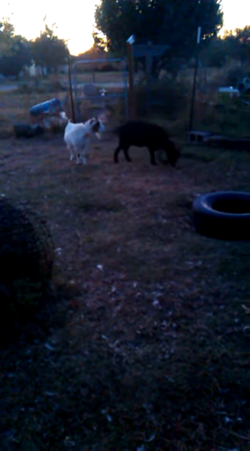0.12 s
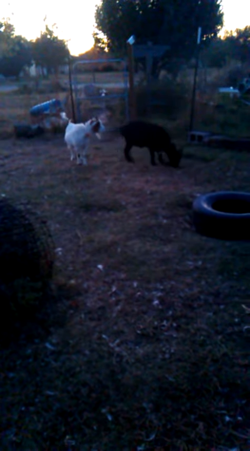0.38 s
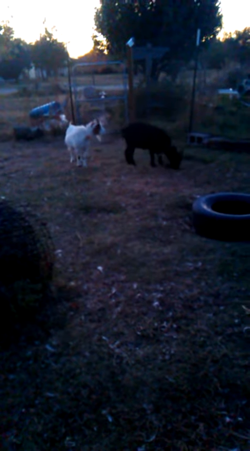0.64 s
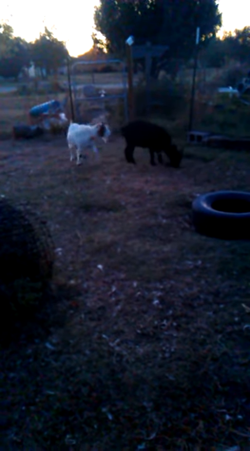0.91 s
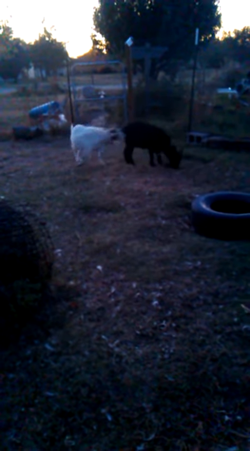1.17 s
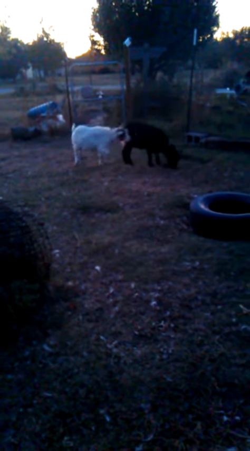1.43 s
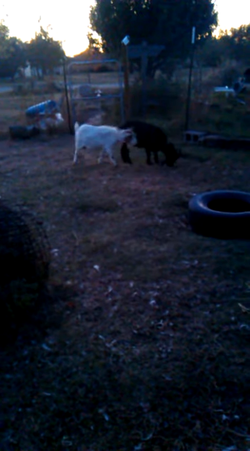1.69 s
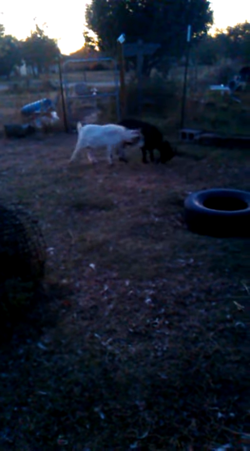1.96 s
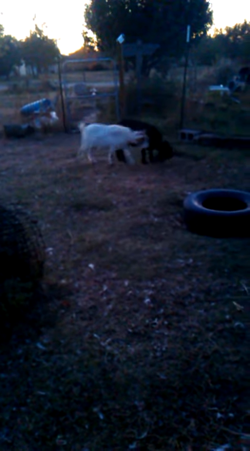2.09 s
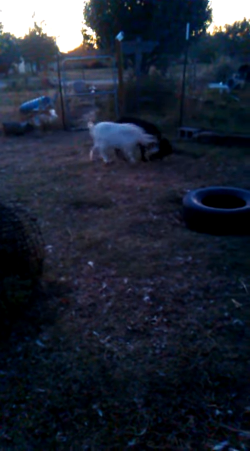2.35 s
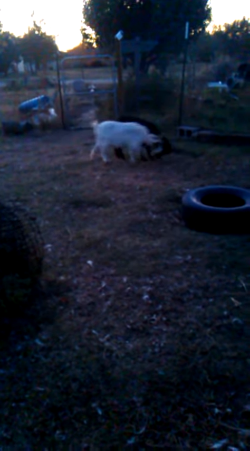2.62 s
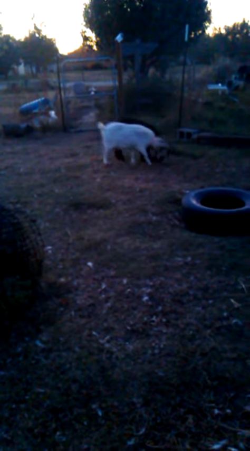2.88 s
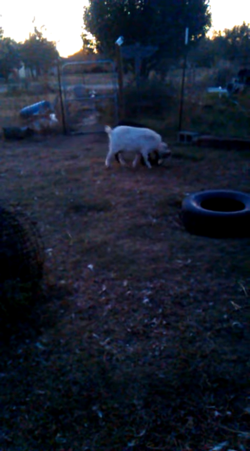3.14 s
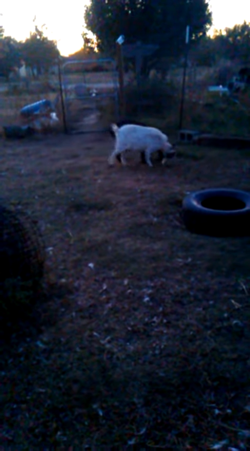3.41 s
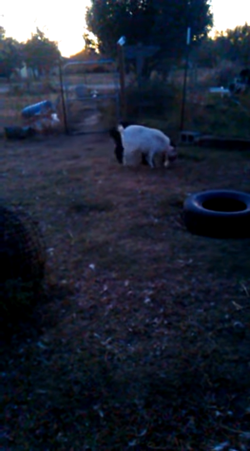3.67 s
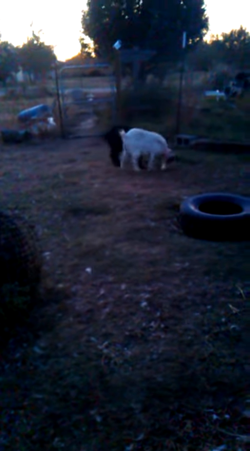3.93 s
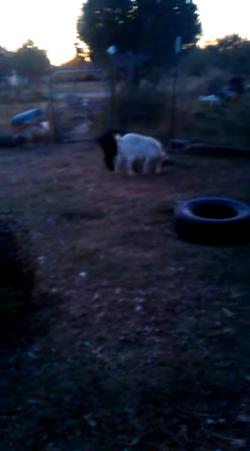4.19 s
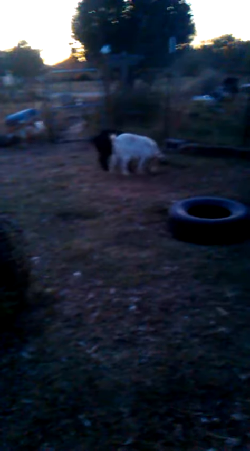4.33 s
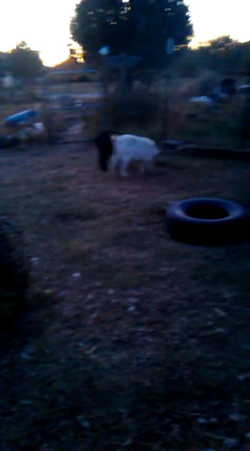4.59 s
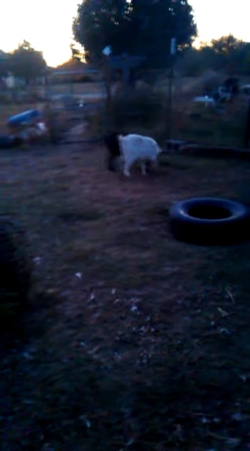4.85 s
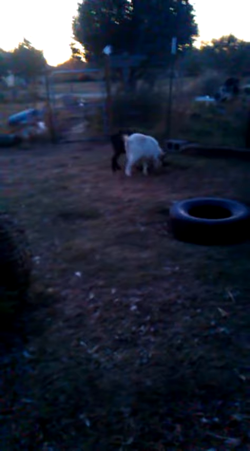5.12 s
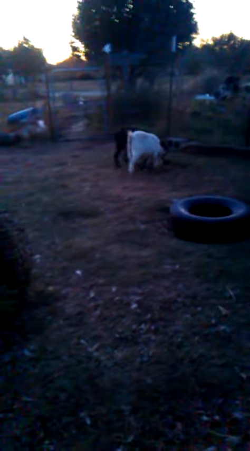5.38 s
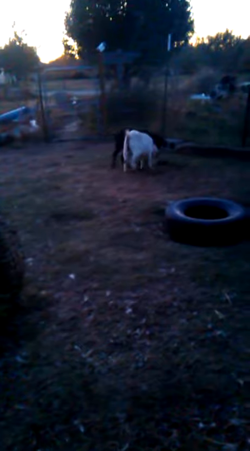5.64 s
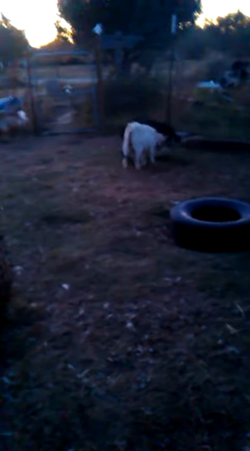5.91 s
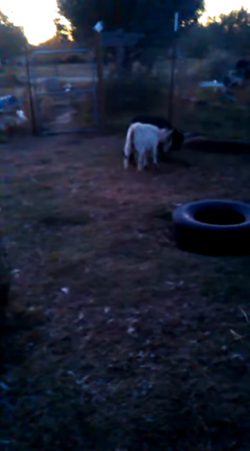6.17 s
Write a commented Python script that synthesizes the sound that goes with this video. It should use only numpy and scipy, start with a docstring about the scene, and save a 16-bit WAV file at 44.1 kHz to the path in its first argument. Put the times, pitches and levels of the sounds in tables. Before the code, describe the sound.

A quiet open yard, heard at a distance: faint low air noise sways under fine hiss, and a far engine hums low, around 140 and 280 Hz, wavering. High insect buzz swells briefly near 0.1, 1.5, 2.3 and 5.8 s. Soft, grainy scuffs on dry earth come irregularly from 0.2 to 2.8 s, with tiny rising bird chirps at the start, 1.1 and 2.7 s. A light click at 2.9 s precedes the goat, by far the loudest sound. It gives a short bleat at 3.0 s, a higher one at 3.3, a harsh, torn scream from 3.45 to 3.8, then a raspy cry at 3.97 that clears at 4.25 into a pure, slightly sagging whine, closing and dropping by 4.6. Short echoes trail away. Small clicks follow at 4.7 and 5.0-5.1, a chirp at 5.2, scattered scuffs, and a last click near 6.2 as the hum strengthens.

```python
"""A goat screams in an open yard: two short bleats, a harsh one, and a last that clears into a pure whine. Its
voice is a pulse train of the vocal folds, roughened by strain, through throat resonances; buildings echo it. A
far engine hums in wavering sine orders; insects are band noise that swells; a bird chirps in two gliding tones.
Scuffs on dry ground are grainy noise strokes; light clicks, and a ring echoing the whine's end, are short
resonant bursts; low air noise sways under hiss."""
import sys
import numpy as np
from scipy import signal
from scipy.fft import rfft, irfft, next_fast_len
from scipy.io import wavfile
from scipy.ndimage import uniform_filter1d

SR = 44100
rng = np.random.default_rng(int(sys.argv[2]) if len(sys.argv) > 2 else 0)


def generate_wav(sig):
    """Save sig (samples, or channels by samples) to the path in sys.argv[1] as 16-bit PCM at SR."""
    pcm = np.round(np.clip(np.atleast_2d(sig).T, -1, 1) * 32767).astype(np.int16)
    wavfile.write(sys.argv[1], SR, pcm)


N = 277389
TIME_S = np.arange(N) / SR

# Air noise spectrum. Each row: frequency in Hz, relative density in dB per Hz.
AIR_SPECTRUM = [(8, -22), (18, 0), (27, -1.5), (38, -21), (52, -11), (90, -23), (230, -14.5), (400, -16.5),
                (670, -20), (1100, -24), (1900, -30), (2800, -33.5), (5200, -33.5), (7700, -36.5),
                (15500, -39)]
AIR_RMS_DB = -58.5  # before the slow sway

# Hum of the far engine. Each row: time in seconds, first order level in dB, second order level in dB.
ENGINE_LEVELS = [(0.0, -73, -60), (0.42, -73, -66), (0.7, -69, -55.5), (2.52, -82.5, -66.5),
                 (2.79, -64.5, -58), (3.78, -66.5, -62.5), (4.2, -74, -79.5), (4.57, -64, -61.5),
                 (6.17, -60.5, -59), (6.29, -57, -56.5)]
ENGINE_START_HZ, ENGINE_SAG_HZ_PER_S = 142.4, 0.7  # firing rate, slowly falling

# Swells of the insect chorus. Each row: centre in seconds, time from peak to 1/e in seconds, peak level in dB.
INSECT_SWELLS = [(.07, 0.23, -64.5), (1.462, 0.12, -59), (2.294, 0.22, -71.5), (5.786, 0.13, -59.5),
                 (6.3, .13, -68)]
INSECT_BED_DB = -73

# Bird chirps. Each row: start in seconds, level before the envelope in dB.
BIRD_CHIRPS = [(-.03, -51.5), (1.109, -46), (2.723, -47), (5.216, -46)]

# Soft scuffs. Each row: centre in seconds, half length (to -17 dB) in seconds, body level in dB,
# gritty top level in dB.
SCUFF_STROKES = [(.193, 0.041, -54.5, -67), (0.573, .07, -55, -63.5), (0.994, 0.039, -51.5, -63.5),
                 (1.192, 0.039, -51.5, -70), (1.28, .08, -62, -76), (1.449, 0.076, -57.5, -61.5),
                 (1.595, 0.037, -50, -65), (1.855, 0.037, -50.5, -61.5), (2.139, .08, -63, -69),
                 (2.383, 0.034, -54.5, -55.5), (2.799, .075, -58, -69), (4.777, 0.027, -60, -65),
                 (4.993, 0.062, -55.5, -58.5), (5.305, .11, -60.5, -76), (5.614, 0.046, -57.5, -69),
                 (6.02, 0.091, -56, -65.5), (6.228, 0.057, -52.5, -55.5)]
# Spectrum of the gritty top. Each row: frequency in Hz, relative level in dB.
GRIT_SPECTRUM = [(1500, -19), (3000, -0.5), (4300, 6), (5400, 6.5), (6500, -7), (9000, -27), (16000, -9)]
# Ringing of a scuff's body. Each row: multiple of the body resonance, half width (to -12 dB) in Hz,
# relative level in dB.
SCUFF_BODY_MODES = [(.66, 232, -2), (0.838, 190, -4), (1.003, 161, 4.5), (1.26, 170, -4.5),
                    (1.66, 350, -17)]
QUICK_HALF_S, SLOW_HALF_S = 0.06, 0.1  # half lengths of a smooth scuff and of a fully juddering one
QUICK_BODY_HZ, SLOW_BODY_HZ, SLOW_JUDDER_DEPTH = 1950, 1430, 0.9

# Light clicks, and one ring at 4.683 s that echoes the end of the whine. Each row: start in seconds, # peak
# level in dB, ring in Hz, T60 in seconds.
SHORT_RINGS = [(2.932, -44, 6400, .0065), (4.683, -41, 5100, .042), (4.969, -42, 4870, 0.013),
               (5.062, -48.5, 634, .06), (5.1174, -34.5, 5300, 0.011), (5.129, -47, 272, 0.14),
               (6.173, -42.5, 6060, 0.043)]

# Reflections from ground, fence and buildings. Each row: delay in seconds, relative level in dB.
YARD_ECHOES = [(.021, -23), (.052, -20), (.09, -18)]
# Decay of the yard's tail. Each row: frequency in Hz, T60 in seconds.
YARD_DECAY = [(300, 0.28), (1200, 0.86), (3000, 0.73), (5500, 0.43), (12000, 0.13)]

# Throat resonances for five shapes of the mouth.
# Each row: centre in Hz, half width (to -12 dB) in Hz, relative level in dB.
HALF_OPEN_MODES = [(583, 170, 18.5), (990, 155, -6), (1378, 146, 8), (2017, 290, -10.5), (2950, 215, -14),
                   (4250, 160, 1.5), (4674, 250, 5.5), (5380, 205, -2.5), (6310, 420, -6), (8400, 490, -31),
                   (9820, 180, -18), (11050, 660, -40), (12700, 580, -39)]
HALF_OPEN_CLEAR_MODES = [(553, 160, 7), (1067, 93, -14), (1510, 400, -12), (2120, 200, -10.5),
                         (2930, 186, -13), (4275, 177, -10), (4747, 207, 5), (5510, 110, -1),
                         (6180, 400, -4.5), (8700, 660, -29.5), (9850, 230, -29), (10900, 410, -33),
                         (12900, 450, -33)]
WIDE_OPEN_MODES = [(633, 303, 18), (1032, 53, 2), (1367, 192, 4.5), (1756, 367, -4), (2830, 170, -15),
                   (3255, 250, -20.5), (4120, 220, -16.5), (4817, 330, -5), (5587, 475, 0),
                   (6130, 460, -14.5), (6980, 160, -27), (8130, 760, -28.5), (8940, 410, -35),
                   (10560, 820, -35)]
NARROWING_MODES = [(592, 207, -9.5), (1018, 135, -1), (1328, 113, 5), (1740, 330, -10.5),
                   (2730, 240, -18.5), (4016, 250, -4), (4650, 280, 1), (5550, 310, 3.5),
                   (6300, 300, -11.5), (7100, 120, -22), (8260, 970, -26), (9870, 320, -23.5),
                   (11060, 310, -28.5)]
WHINE_MODES = [(586, 370, 2.5), (1195, 344, -1.5), (2660, 130, -26.5), (3717, 89, 3.5), (4345, 340, 3),
               (5080, 190, -6.5), (5630, 160, -10.5), (6338, 107, 1.5), (7060, 820, -19), (8540, 500, -28),
               (9670, 340, -17.5), (10100, 160, -27), (10800, 290, -24), (11900, 300, -32)]

# Bleats. Each row: start in seconds, length in seconds, rise to the top pitch in seconds, first pitch in Hz,
# top pitch in Hz, last pitch in Hz, attack time constant in seconds, release in seconds, chest level in dB,
# open mouth level in dB, shrill edge level in dB, roughness 0-1, quaver in dB.
BLEAT_EVENTS = [(2.985, 0.21, .075, 471, 556, 493.5, 0.0063, 0.031, -36, -34.5, -27.5, 0.22, 0),
                (3.285, .134, .053, 501, 750, 655, .002, .032, -32, -27.5, -28.5, .31, 2),
                (3.459, .371, .1, 655, 675, 648, 0.012, .082, -32, -27, -22.2, .77, .5),
                (3.974, .29, 0.25, 600, 643, 635, .014, 0.034, -33, -31.5, -26.5, .3, .5)]
# Spells in which the voice breaks into a rasp. Each row: start in seconds, length in seconds, roughness 0-1,
# pitch bend as a share, level change in dB.
RASP_SPELLS = [(3.047, 0.076, 0.79, .05, 5), (3.269, 0.038, 0.88, 0.00084, -6.5),
               (3.39, 0.043, 0.86, -0.014, -3.5), (3.45, 0.31, 0.77, 0, -0.5),
               (3.961, 0.28, .72, -.06, -0.5)]
RASP_BREAK_S, RASP_SHRILL_SHARE = 0.0041, 0.47  # onset time; share of the level change in the shrill edge
PITCH_ARCH_POWER, QUAVER_HZ = 1.5, 19.1
ONSET_DB, RELEASE_DB = -19, -16  # level change at a bleat's very start and end
CHEST_LAG, SHRILL_LAG = 1.7, 1.53  # attack time relative to the open mouth
SHRILL_TIRING_DB_PER_S = -13

# Whine. Triples of dB: chest, open mouth, shrill edge.
WHINE_START_S, WHINE_LENGTH_S, WHINE_ATTACK_S = 4.238, 0.362, 0.0057
WHINE_START_HZ, WHINE_SAG_HZ, WHINE_ROUGHNESS = 645.5, 30.76, 0.022
WHINE_REGISTERS_DB, WHINE_TIRING_DB_PER_S = (-35, -27.5, -32), -19  # tiring: shrill edge only
CLOSING_S, CLOSING_CHANGES_DB = 0.074, (10, -11.5, 4)  # the mouth shuts
# The folds slacken at the very end: time constant, pitch drop, added roughness, level change.
LET_GO_S, LET_GO_HZ, LET_GO_ROUGHNESS, LET_GO_DB = 0.009, 56, 0.37, -3.5

BAND_EDGE_HZ = 15750


def amp(db):
    """Decibels to gain."""
    return 10 ** (np.asarray(db) / 20)


def unit(x):
    """Scales to rms 1."""
    return x / np.sqrt(np.mean(x ** 2) + 1e-20)


def read(points, hz):
    """Interpolates a spectrum table on a log-frequency axis."""
    table_hz, value = np.transpose(points)
    return np.interp(np.log(hz + 1), np.log(table_hz + 1), value)


def add(mix, start_s, sound):
    """Mixes a sound in, cropped to the mix."""
    start = round(start_s * SR)
    sound = sound[max(-start, 0):]
    part = mix[max(start, 0):][:len(sound)]
    part += sound[:len(part)]


def shape(x, gain, padding=4096):
    """Filters x by a gain that is a function of frequency."""
    n = next_fast_len(len(x) + padding)
    return irfft(rfft(x, n) * gain(np.fft.rfftfreq(n, 1 / SR)), n)[:len(x)]


def hiss(points, n):
    """Noise of rms 1 with a given spectrum."""
    return unit(shape(rng.standard_normal(n), lambda f: amp(read(points, f))))


def below(f, edge_hz, order=16):
    """Gain of a low-pass, one half at its edge."""
    return 1 / (1 + (f / edge_hz) ** order)


def wobble(n, rate_hz):
    """Random motion of rms 1, mostly slower than a given rate."""
    return unit(shape(rng.standard_normal(n), lambda f: below(f, rate_hz, order=4)))


def throat(x, modes):
    """Steep resonances with dark valleys between them; each rings on and so delays its own band."""
    def response(f):
        gain = sum(amp(db) / (1 + ((f - hz) / width_hz) ** 2) ** 2 for hz, width_hz, db in modes)
        lag = sum(np.arctan((f - hz) / width_hz) + np.arctan((f + hz) / width_hz)
                  for hz, width_hz, db in modes)
        return gain * np.exp(-4j * lag)
    return shape(x, response)


def air(swell_db=2.0, sway_edge_hz=900):
    """Far-off low sound rises and falls a little under a steady fine hiss."""
    noise = amp(AIR_RMS_DB) * hiss(AIR_SPECTRUM, N)
    low = shape(noise, lambda f: below(f, sway_edge_hz, order=4))
    high = noise - low
    return low * amp(swell_db * wobble(N, 2.4)) + high


def engine(third_db=-9, fourth_db=-14, half_db=-13):
    """Low orders of a far engine's firing rate, each wavering in the moving air."""
    table_s, first_db, second_db = np.transpose(ENGINE_LEVELS)
    first_db = np.interp(TIME_S, table_s, first_db)
    second_db = np.interp(TIME_S, table_s, second_db)
    hz = ENGINE_START_HZ - ENGINE_SAG_HZ_PER_S * TIME_S
    turns = np.cumsum(hz * (1 + 0.0043 * wobble(N, 10.6))) / SR
    orders = [(1, first_db), (1.5, first_db + half_db), (2, second_db),
              (3, second_db + third_db), (4, second_db + fourth_db)]
    hum = np.zeros(N)
    for order, db in orders:
        level = np.sqrt(2) * amp(db + 0.62 * wobble(N, 11.0))  # sqrt(2): rms to peak
        hum += level * np.sin(2 * np.pi * (order * turns + rng.random()))
    return hum


def insects(centre_hz=5500, width_hz=1300):
    """A high band of noise, flickering in level, that swells out of a faint bed and fades again."""
    buzz = unit(throat(rng.standard_normal(N), [(centre_hz, width_hz, 0)]))
    swells = sum(amp(db) * np.exp(-((TIME_S - centre_s) / half_s) ** 2)
                 for centre_s, half_s, db in INSECT_SWELLS)
    return buzz * (amp(INSECT_BED_DB) + swells) * amp(1.2 * wobble(N, 70))


def bird(length_s=0.053, start_hz=5200, top_hz=6100, rise_s=0.02, second_voice_db=-4):
    """Each chirp slurs up and levels off, fluttering, with a second voice just below."""
    out, t = np.zeros(N), np.arange(0, length_s, 1 / SR)
    envelope = np.minimum(t / 0.014, 1) * np.sqrt(1 - t / length_s)
    for start_s, db in BIRD_CHIRPS:
        hz = top_hz + (start_hz - top_hz) * np.exp(-(t / rise_s) ** 2) + 130 * wobble(len(t), 340)
        phase = 2 * np.pi * np.cumsum(hz) / SR
        song = unit(np.sin(phase) + amp(second_voice_db) * np.sin(0.915 * phase))
        flutter = amp(db + 3.9 * wobble(len(t), 220))
        add(out, start_s, song * flutter * envelope)
    return out


def scuffs(grain_db=1.9, judder_hz=53, squareness=2.4):
    """Strokes over dry earth: hollow body and gritty top, both grainy; slow ones sound lower, stick and slip."""
    out, t = np.zeros(N), np.arange(-SR // 4, SR // 4) / SR
    for centre_s, half_s, body_db, grit_db in SCUFF_STROKES:
        slow = np.clip((half_s - QUICK_HALF_S) / (SLOW_HALF_S - QUICK_HALF_S), 0, 1)
        body_hz = QUICK_BODY_HZ + (SLOW_BODY_HZ - QUICK_BODY_HZ) * slow
        modes = [(k * body_hz, width_hz, db) for k, width_hz, db in SCUFF_BODY_MODES]
        body = unit(throat(rng.standard_normal(len(t)), modes))
        grit = hiss(GRIT_SPECTRUM, len(t))
        judder = np.sin(2 * np.pi * judder_hz * t + wobble(len(t), 27))
        slips = 1 + SLOW_JUDDER_DEPTH * slow * judder
        grain = amp(grain_db * wobble(len(t), 99))
        stroke = np.exp(-2 * abs(t / half_s) ** squareness) * unit(slips * grain)
        add(out, centre_s + t[0], stroke * (amp(body_db) * body + amp(grit_db) * grit))
    return out


def short_rings(spread=0.042):
    """Small snaps and knocks, and a ring just after the whine ends: a noise burst in one resonance, relatively
    narrower the longer it rings."""
    out, t = np.zeros(N), np.arange(SR // 5) / SR
    for start_s, peak_db, hz, t60_s in SHORT_RINGS:
        ringing = throat(rng.standard_normal(len(t)), [(hz, spread * hz / np.sqrt(t60_s), 0)])
        burst = ringing[len(t) // 2:]  # skips the filter's build-up
        burst_t = t[:len(burst)]
        burst = burst * amp(-60 * burst_t / t60_s) * (1 - np.exp(-burst_t * hz))
        add(out, start_s, amp(peak_db) * burst / abs(burst).max())
    return out


def yard(x, tail_db, echo_db, dull_hz=2600, treble_db=-7):
    """Adds a few distinct echoes, dulled by the surfaces, and a thin tail scattered by trees."""
    taps = rng.standard_normal(SR) * (rng.random(SR) < 2500 / SR)  # about 2500 reflections a second
    taps = taps * np.clip(TIME_S[:SR] / 0.0044, 0, 1)
    hz, t, bands = signal.stft(taps, SR, nperseg=256)
    decay = amp(-60 * t / read(YARD_DECAY, hz)[:, None])
    tail = signal.istft(bands * decay, SR, nperseg=256)[1]
    echoes = np.zeros(len(tail))
    for delay_s, db in YARD_ECHOES:
        add(echoes, delay_s, amp([db]))
    echoes = shape(echoes, lambda f: amp(echo_db + treble_db * (1 - below(f, dull_hz, order=4))))
    response = amp(tail_db) * tail / np.linalg.norm(tail) + echoes
    return x + signal.fftconvolve(x, response)[:N]


def folds(hz, rough, shimmer_db=6.8, doubling=0.44, leak=0.036, harmonics=27):
    """Pulses of the vocal folds; strain makes them uneven in time and size, alternately strong and weak."""
    n = len(hz)
    chaos = rough ** 1.5
    jitter = 0.095 * chaos * wobble(n, 150) + 0.0009 * wobble(n, 40)
    turns = np.cumsum(hz * (1 + jitter)) / SR
    pulses = unit(sum(np.cos(2 * np.pi * k * turns) for k in range(1, harmonics + 1)))
    alternate = 1 + doubling * chaos * np.cos(np.pi * turns)
    rush = (0.55 * chaos + leak) * rng.standard_normal(n)  # turbulent breath
    rattle = amp(shimmer_db * chaos * np.tanh(wobble(n, 210)))
    return (pulses * alternate + rush) * rattle


def rasp(t, rough):
    """Roughness, pitch factor and added dB: a rasp switches in abruptly and bends the pitch in its middle."""
    bend, gain_db = 1, 0
    for start_s, length_s, harsh, share, db in RASP_SPELLS:
        since = t - start_s
        inside = (np.tanh(since / RASP_BREAK_S) - np.tanh((since - length_s) / RASP_BREAK_S)) / 2
        rough = rough + (harsh - rough) * inside
        bend = bend + share * np.sin(np.pi * np.clip(since / length_s, 0, 1))
        gain_db = gain_db + db * inside
    return rough, bend, gain_db


def cry(hz, rough, effort_db, mouth, clear_mouth, window=1100):
    """Folds through a throat that changes shape as the voice clears; effort sets the level of three registers."""
    t = TIME_S[:len(hz)]
    rough = np.clip(rough, 0, 1)
    drive = folds(hz, rough)
    strained = np.clip(rough / 0.5, 0, 1)
    sound = throat(drive * strained, mouth) + throat(drive * (1 - strained), clear_mouth)
    sound = shape(sound, lambda f: 1 - below(f, 317, order=6))  # a small mouth radiates little bass
    chest = shape(sound, lambda f: below(f, 917))
    middle = shape(sound, lambda f: below(f, 2700)) - chest
    shrill = sound - chest - middle
    out = 0
    for register, db in zip((chest, middle, shrill), effort_db):
        power = uniform_filter1d(uniform_filter1d(register ** 2, window), window)
        out = out + amp(db) * register / np.sqrt(abs(power) + 1e-12)  # levelled, then set to the effort
    return out * np.clip(np.minimum(t, t[-1] - t) / 0.0029, 0, 1)


def bleat(row, mouth, clear_mouth):
    """One arch of pitch under an attack, a quavering hold and a release."""
    (start_s, length_s, rise_s, first_hz, top_hz, last_hz, attack_s, release_s,
     chest_db, open_db, shrill_db, rough, quaver_db) = row
    t = np.arange(0, length_s, 1 / SR)
    rising = np.clip(1 - t / rise_s, 0, 1) ** PITCH_ARCH_POWER
    falling = np.clip((t - rise_s) / max(length_s - rise_s, 1 / SR), 0, 1) ** PITCH_ARCH_POWER
    hz = top_hz + (first_hz - top_hz) * rising + (last_hz - top_hz) * falling
    rough, bend, rasp_db = rasp(start_s + t, rough)
    release = RELEASE_DB * np.clip(1 - (length_s - t) / release_s, 0, 1) ** 2
    hold = release - quaver_db * np.cos(2 * np.pi * QUAVER_HZ * t)
    chest_on, open_on, shrill_on = (ONSET_DB * np.exp(-t / (lag * attack_s))
                                    for lag in (CHEST_LAG, 1, SHRILL_LAG))
    tiring = SHRILL_TIRING_DB_PER_S * t
    effort_db = (chest_db + hold + chest_on + rasp_db,
                 open_db + hold + open_on + rasp_db,
                 shrill_db + hold + shrill_on + RASP_SHRILL_SHARE * rasp_db + tiring)
    return start_s, cry(hz * bend, rough, effort_db, mouth, clear_mouth)


def whine():
    """A clear, sagging note; the mouth shuts over it, and the pitch drops as the folds let go."""
    t = np.arange(0, WHINE_LENGTH_S, 1 / SR)
    left_s = WHINE_LENGTH_S - t
    closing = np.exp(-(left_s / CLOSING_S) ** 2)
    slack = np.exp(-left_s / LET_GO_S)
    sag = WHINE_SAG_HZ * (t / WHINE_LENGTH_S) ** PITCH_ARCH_POWER
    hz = WHINE_START_HZ - sag - LET_GO_HZ * slack
    level = ONSET_DB * np.exp(-t / WHINE_ATTACK_S) + LET_GO_DB * slack
    chest, middle, shrill = (db + level + shut_db * closing
                             for db, shut_db in zip(WHINE_REGISTERS_DB, CLOSING_CHANGES_DB))
    effort_db = (chest, middle, shrill + WHINE_TIRING_DB_PER_S * t)
    rough = WHINE_ROUGHNESS + LET_GO_ROUGHNESS * slack
    return WHINE_START_S, cry(hz, rough, effort_db, NARROWING_MODES, WHINE_MODES)


def goat():
    """Four cries in quick succession, each with its strained and clear mouth; the last runs into the whine."""
    out = np.zeros(N)
    mouths = [(HALF_OPEN_MODES, HALF_OPEN_CLEAR_MODES), (WIDE_OPEN_MODES, WIDE_OPEN_MODES),
              (WIDE_OPEN_MODES, WIDE_OPEN_MODES), (NARROWING_MODES, WHINE_MODES)]
    for row, (mouth, clear_mouth) in zip(BLEAT_EVENTS, mouths):
        add(out, *bleat(row, mouth, clear_mouth))
    add(out, *whine())
    return out


def scene():
    """Animals and ground sounds over insects, engine and air; the far bird carries the most echo."""
    background = air() + engine() + insects()
    ground = yard(scuffs(), tail_db=-18, echo_db=-5) + short_rings()
    animals = yard(bird(), tail_db=-13.0, echo_db=4) + yard(goat(), tail_db=-15.7, echo_db=-1.5)
    return (background + ground + animals)[None]


def record(dry):
    """The recorder's band limit: a steep linear-phase low-pass."""
    lowpass = signal.firwin(511, BAND_EDGE_HZ, window=("kaiser", 9), fs=SR)
    return signal.oaconvolve(dry, lowpass[None], "same")


dry = scene()
out = record(dry)
generate_wav(out)
```